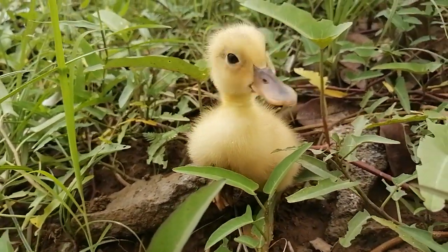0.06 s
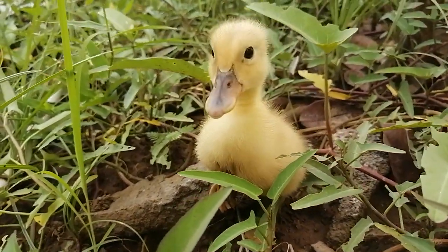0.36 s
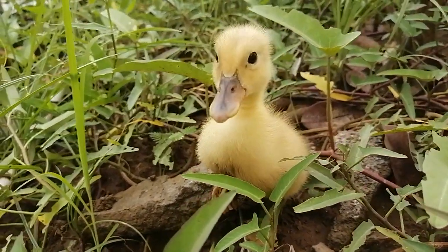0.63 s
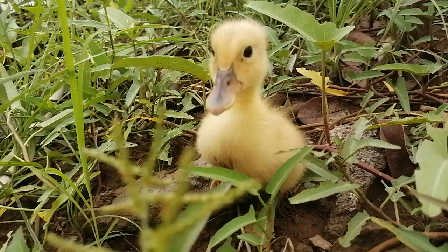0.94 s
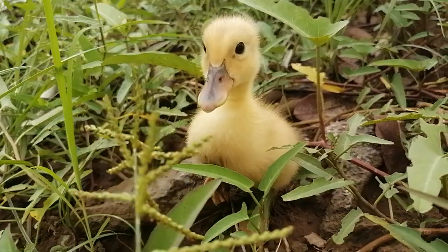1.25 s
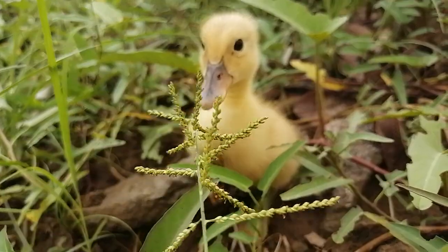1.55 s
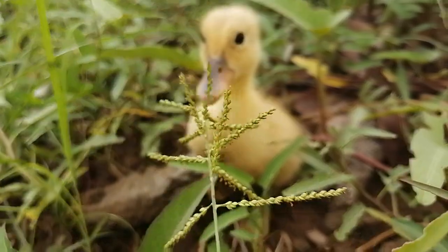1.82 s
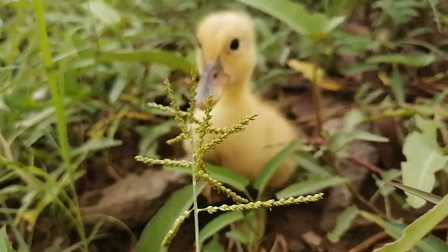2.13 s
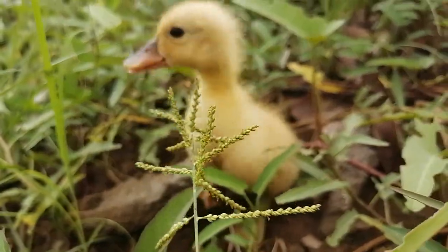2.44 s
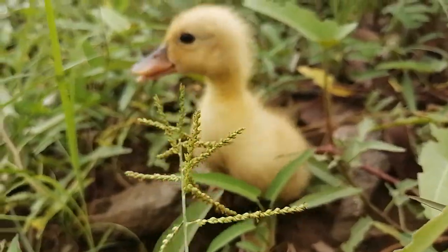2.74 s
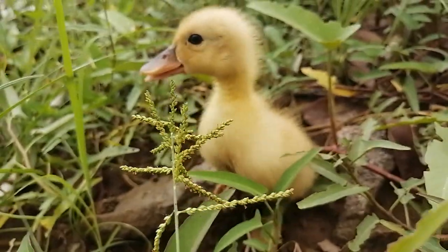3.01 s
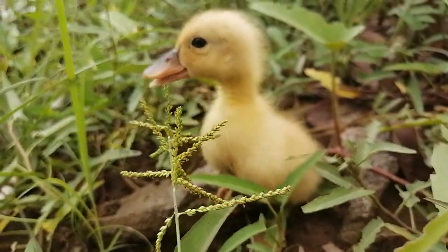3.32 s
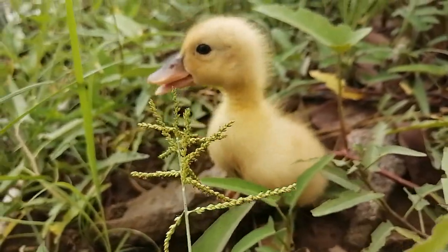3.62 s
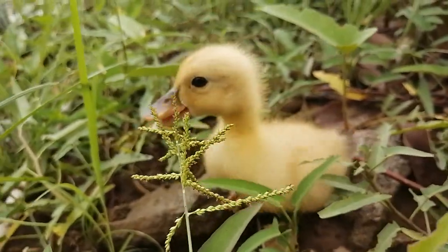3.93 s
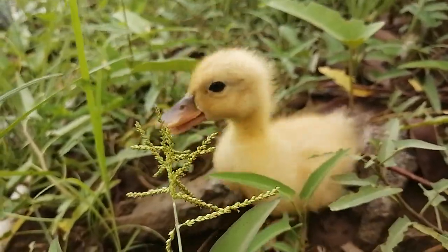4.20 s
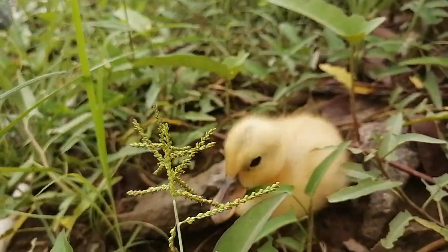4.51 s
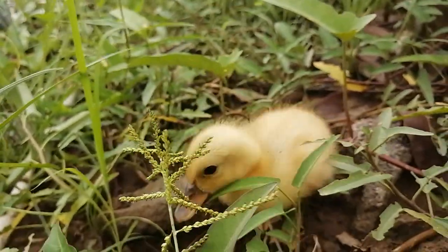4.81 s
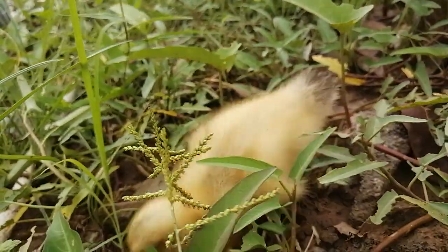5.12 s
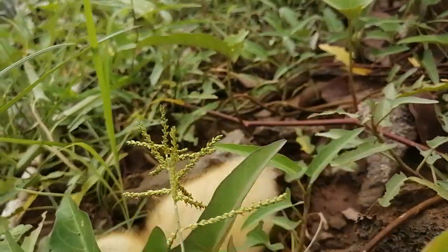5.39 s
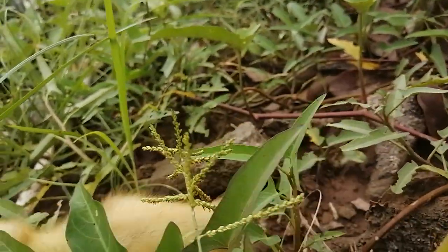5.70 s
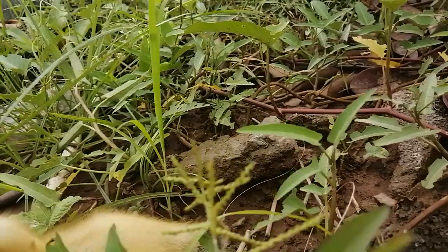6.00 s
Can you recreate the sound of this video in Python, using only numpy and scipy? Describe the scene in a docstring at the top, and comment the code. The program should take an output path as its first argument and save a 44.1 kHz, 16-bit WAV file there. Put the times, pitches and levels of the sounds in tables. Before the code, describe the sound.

High, slightly raspy duckling peeps repeat evenly and grow louder, followed by light ticks and rustling of plants outdoors.

```python
"""A low outdoor rumble comes first, with a far motor, a thin electronic whine and distant bird calls.
Then a duckling in the grass peeps fourteen times, five soft and nine loud, mostly on the left.
All but the first peep open with a rasp, the two sides of the syrinx beating, and slide into a
pure whistle. Stalks tick as the duckling moves, and the rustle grows as it pushes off at the end."""
import sys
import numpy as np
from scipy import signal
from scipy.io import wavfile
from scipy.ndimage import map_coordinates

SR = 44100
rng = np.random.default_rng(int(sys.argv[2]) if len(sys.argv) > 2 else 0)


def wrap_up_sound(samples):
    """Save the sound to the file named by the first command line argument, as 16-bit audio."""
    columns = np.atleast_2d(samples).T
    # keep every value between -1 and 1, then stretch to whole-number steps
    tamed = np.clip(columns, -1, 1)
    steps = np.round(tamed * 32767).astype(np.int16)
    wavfile.write(sys.argv[1], SR, steps)


N = 271215


def from_db(db):
    """Decibels to gain."""
    return 10 ** (np.asarray(db) / 20)


def unit_rms(x):
    """Scale to rms 1."""
    return x / np.sqrt(np.mean(x ** 2) + 1e-20)


def at_hz(curve, hz):
    """Read a curve on a log-frequency axis."""
    freqs, values = np.transpose(curve)
    return np.interp(np.log(hz), np.log(freqs), values)


def panned(db):
    """Stereo gains for a pan in dB, left over right."""
    return from_db(np.array([[db], [-db]]) / 2)


def band(x, low_hz, high_hz, order=2):
    """Band-pass."""
    sos = signal.butter(order, [low_hz, min(high_hz, SR / 2 - 500)], "band", fs=SR, output="sos")
    return signal.sosfilt(sos, x)


def drift(rate, n):
    """Smooth random modulation through rate points a second; spread near 1."""
    steps = np.arange(n) / SR * rate
    return map_coordinates(rng.standard_normal(int(steps[-1]) + 3), [steps], order=2, mode="nearest")


def phase_of(hz):
    """Running phase of a moving pitch."""
    return 2 * np.pi * np.cumsum(hz) / SR


def add(out, s, sound):
    """Mix a sound in from time s."""
    i = int(s * SR)
    out[:, i:i + sound.shape[-1]] += sound[..., :N - i]


def scatter(x, t60, low_hz, high_hz):
    """Outdoor reverb: countless small reflections from plants and ground, different on each side."""
    t = np.arange(int(t60 * SR)) / SR
    tail = band(rng.standard_normal((2, len(t))), low_hz, high_hz) * from_db(-60 * t / t60)
    return signal.fftconvolve(x[None], tail / np.sqrt(np.sum(tail ** 2) / 2), axes=1)[:, :N]


# tone of the air bed: f/Hz, relative density/dB
AIR_SPECTRUM = [(25, -10.5), (40, -6), (58, 3), (110, -1.5), (165, -7.5), (230, -12.5), (420, -21),
                (700, -27), (1700, -33), (4800, -37), (6700, -44.5), (9500, -51), (11800, -62.5),
                (14700, -55)]
# its width: f/Hz, left-right coherence (1 is mono)
AIR_COHERENCE = [(60, 0.99), (120, 0.9), (220, 0.8), (430, 0.31), (830, 0.088), (1600, 0), (6000, 0)]
# its balance: f/Hz, pan/dB
AIR_BALANCE = [(60, -4.5), (400, -5.5), (1300, -1.5), (3000, 5.5), (5000, -0.5), (8000, -3.5), (15000, -3)]
# swells in the rumble: t/s, rise/dB
RUMBLE_SWELLS = [(2.17, 3.5), (2.74, 5), (3.42, 2.5), (3.96, 5), (4.49, 4)]


def air(calm_db=-53, swell_half_width_s=.09, rustle_from_s=5.24, rustle_db_per_s=2.5):
    """Half-octave noise bands: a near-mono rumble, and a wide rustle rising as the duckling moves off."""
    t = np.arange(N) / SR
    swells_db = sum(rise * np.exp(-((t - s) / swell_half_width_s) ** 2) for s, rise in RUMBLE_SWELLS)
    rumble_db = swells_db + drift(6.4, N)
    rustle_db = rustle_db_per_s * np.maximum(t - rustle_from_s, 0)
    white = rng.standard_normal((2, 2, N))
    edges = 22 * 2 ** np.arange(0, 10, .5)
    out, calm = 0, 0
    for k, (low, high) in enumerate(zip(edges, edges[1:])):
        hz = np.sqrt(low * high)
        mid, side = band(white[k % 2], low, high)
        coherence = at_hz(AIR_COHERENCE, hz)
        gain = from_db(at_hz(AIR_SPECTRUM, hz) + drift(11, N)) * panned(at_hz(AIR_BALANCE, hz))
        noise = gain * (np.sqrt(1 + coherence) * mid + np.sqrt(1 - coherence) * side * [[1], [-1]])
        calm = calm + noise
        out = out + noise * from_db(rumble_db * (hz < 130) + rustle_db * (350 < hz < 7000))
    return from_db(calm_db) * out / np.std(calm)


# tones of the electronics: f/Hz, left rms/dB, right rms/dB
WHINE_TONES = [(2046, -85, -93), (2767, -76, -88), (3430, -78.5, -94), (3490, -81, -94), (4150, -86.5, -90),
               (4812, -91, -92), (5534, -100, -88), (6225, -105, -93), (7590, -103, -95), (9685, -96, -115),
               (14492, -114, -94.5)]
# narrow bands of hiss: f/Hz, width/Hz, left rms/dB, right rms/dB
HISS_BANDS = [(4670, 270, -81, -85), (9580, 260, -89, -112), (14650, 950, -112, -89)]


def whine(wobble_hz=3):
    """The electronics whine in thin, nearly steady tones over narrow bands of hiss."""
    out = np.zeros((2, N))
    for hz, left, right in WHINE_TONES:
        tone = np.sqrt(2) * np.sin(phase_of(hz + wobble_hz * drift(60, N)))
        out += from_db([[left], [right]]) * tone
    for hz, width, left, right in HISS_BANDS:
        hiss = band(rng.standard_normal((2, N)), hz - width / 2, hz + width / 2)
        out += from_db([[left], [right]]) * unit_rms(hiss)
    return out


# partials of the motor's drone: f/Hz, base level/dB
MOTOR_ORDERS = [(143, -66), (248, -68.5), (296, -72), (354, -79.5), (395, -77.5)]
# how well the drone carries: t/s, gain/dB
MOTOR_RIDE = [(0, -1), (1.899, -5), (2.798, 2.5), (3.601, 0.5), (4.601, 1), (6.15, 1.5)]


def motor(wander=.009, sway_db=3):
    """Low orders of a far motor, swaying as the air carries them."""
    carry_db = np.interp(np.arange(N) / SR, *np.transpose(MOTOR_RIDE))
    drone = np.zeros(N)
    for hz, db in MOTOR_ORDERS:
        gain = np.sqrt(2) * from_db(db + carry_db + sway_db * (drift(3.7, N) - .5))
        drone += gain * np.sin(phase_of(hz * (1 + wander * drift(12, N))))
    return drone * panned(-0.5)


def far_tones(notes, fall_octaves_per_s, waver, direct_db, wet_db, t60, wet_band_hz):
    """Tones that slide down at a steady rate, smeared by the distance."""
    out = np.zeros((2, N))
    for s, length, start_hz, db, pan_db in notes:
        t = np.arange(int(length * SR)) / SR
        hz = start_hz * 2 ** (-fall_octaves_per_s * t) * (1 + waver * drift(400, len(t)))
        note = from_db(db) * np.sqrt(np.sin(np.pi * t / length)) * np.sin(phase_of(hz))
        add(out, s, panned(pan_db) * from_db(direct_db) * note)
        add(out, s, panned(pan_db) * from_db(wet_db) * scatter(note, t60, *wet_band_hz))
    return out


# one motor swell, then five hoots:
# t/s, length/s, starting f/Hz, level before the direct and wet gains/dB
LOW_TONE_CUES = [(.08, .21, 352.6, -62), (.1, 0.27, 644, -72), (2.70, 0.16, 444, -62),
                 (3.05, .27, 440, -59), (3.42, 0.11, 459.5, -67), (3.862, .3, 439, -57.5)]


def low_tones(pan_db=-8.5):
    """Far off on the right: a brief swell of the motor's 353 Hz drone, then soft, almost level hoots."""
    return far_tones([(*cue, pan_db) for cue in LOW_TONE_CUES], fall_octaves_per_s=.15, waver=0.0039,
                     direct_db=0.5, wet_db=-20, t60=.5, wet_band_hz=(253, 895))


# chirp cues: t/s, length/s, starting f/Hz, level before the direct and wet gains/dB, pan/dB
CHIRP_CUES = [(.06, .12, 4650, -71.5, 5), (.285, 0.021, 1725, -63.5, 9), (4.116, 0.02, 1397, -55, -14.5),
              (4.284, 0.018, 1043, -55.5, -8), (5.39, 0.15, 4710, -72, 6), (5.615, .056, 3040, -59.5, -2),
              (5.715, 0.042, 2805, -59, -6.5), (5.995, .045, 2973, -60.5, -6),
              (6.105, .043, 2656, -57.5, -7)]


def birds():
    """Far birds chirp in short, rough, quickly falling notes."""
    return far_tones(CHIRP_CUES, fall_octaves_per_s=6.4, waver=0.05,
                     direct_db=-4.5, wet_db=-8, t60=.25, wet_band_hz=(905, 5000))


# ticks of stalks and dry leaves: t/s, level before panning/dB, centre f/Hz, t60/s
STALK_TICKS = [(2.925, -56.5, 5180, .01), (4.225, -60, 6500, .008), (4.409, -59.5, 5000, 0.094),
               (5.05, -64, 2500, 0.0123), (5.302, -62.5, 2500, .04), (5.346, -54.5, 1220, .09),
               (5.352, -57, 3100, 0.019), (5.379, -59, 3460, 0.024), (5.894, -71, 3150, .03),
               (5.921, -65, 1400, .04)]


def stalks(band_ratio=1.16, pan_db=6.5):
    """Each tick is a quickly damped noise burst around the stalk's pitch."""
    out = np.zeros((2, N))
    for s, db, hz, t60 in STALK_TICKS:
        t = np.arange(int(t60 * SR)) / SR
        burst = unit_rms(band(rng.standard_normal((2, len(t))), hz / band_ratio, hz * band_ratio))
        add(out, s, panned(pan_db) * from_db(db - 60 * t / t60) * burst)
    return out


def tone_on_left(hz, pan_curve, left_lag_s=0.000322):
    """A sine that is quieter on the right and arrives a fraction of a millisecond later on the left."""
    phase = phase_of(hz)
    right = from_db(-at_hz(pan_curve, hz)) * np.sin(phase + 2 * np.pi * hz * left_lag_s)
    return np.array([np.sin(phase), right])


def peep_pitch(t, length, turns_s, turns_hz, drop=0.23, drop_s=0.01, jitter=0.0023, waver=.005):
    """The muscles ease from one pitch to the next; the pitch collapses as the air stops."""
    turns = np.arange(len(turns_s))
    stage = np.interp(t, turns_s, turns)
    eased = np.floor(stage) + (1 - np.cos(np.pi * (stage % 1))) / 2
    collapse = 1 - drop * np.clip((t - length) / drop_s + 1, 0, 1) ** 2
    wobble = 1 + jitter * drift(600, len(t)) + waver * drift(82.8, len(t))
    return np.interp(eased, turns, turns_hz) * collapse * wobble


# a peep's tail after its pitch dip: dip f/Hz, end pitch over dip pitch, sag below the swell/dB
PEEP_TAILS = [(2185, 0.86, 10.5), (2323, 0.997, 4), (2428, 1.056, 1.5), (2550, 1.027, 7), (2805, 1.068, 3)]


def peep(length, crest_hz, dip_hz, swell_db, pan_curve, attack_s=0.00092, release_s=0.013,
         recover_s=0.036, shimmer_db=1.14, beat_waver=.14, upper_ratio=1.363, hiss_db=-41):
    """The syrinx whistles up to a crest, down to a dip and into a tail; effort shapes the rasp."""
    t = np.arange(int(length * SR)) / SR
    effort = np.interp(swell_db, [-44, -18.5], [0, 1])

    def by_effort(soft, loud):
        return soft + (loud - soft) * effort

    dip_s = 0.066 * (length / 0.11) ** 0.39   # a shorter peep dips sooner
    crest_s = .373 * dip_s
    dips, end_ratios, sags = np.transpose(PEEP_TAILS)
    start_hz = crest_hz * by_effort(.98, .94)
    end_hz = dip_hz * np.interp(dip_hz, dips, end_ratios)
    hz = peep_pitch(t, length, [0, crest_s, dip_s, dip_s + recover_s],
                    [start_hz, crest_hz, dip_hz, end_hz])

    # the level swells to its peak between the pitch crest and the dip
    swell_s = crest_s + (dip_s - crest_s) * by_effort(0.67, 0.45)
    crest_db = swell_db + by_effort(-6.5, -8.5)
    onset_db = crest_db + by_effort(-8.05, -23.69)
    held_db = swell_db - np.interp(dip_hz, dips, sags)
    level_db = np.interp(t, [0, crest_s, swell_s, dip_s], [onset_db, crest_db, swell_db, held_db])
    # a soft peep nearly breaks just after its crest
    break_db = by_effort(-7, 0) * np.exp(-((t - crest_s - .007) / 0.0035) ** 2)
    gate = np.minimum(t / attack_s, 1) * np.clip((length - t) / release_s, 0, 1)
    envelope = gate * from_db(level_db + break_db + shimmer_db * drift(150, len(t)))

    # the other side of the syrinx runs sharp and beats against the first until they lock at the crest
    unlocked = np.interp(t, [.004, .009, crest_s - .001, crest_s + .0035], [.1, 1, 0.6, 0.014])
    rasp = from_db(by_effort(5.5, 2)) * unlocked * (crest_hz > 3000)
    beat_hz = by_effort(240, 385) * np.interp(t, [0, .013], [.5, 1])
    beat_hz *= 1 + beat_waver * drift(500, len(t))
    # a hard push adds a higher arch over the crest
    arch = np.sin(np.pi * np.clip((t - .005) / 0.041, 0, 1)) * (dip_hz > 2290)
    upper = arch * from_db(by_effort(-17.55, -11.85) + np.minimum(0, crest_db - level_db))
    upper_hz = hz * upper_ratio * np.interp(t, [0, crest_s], [.95, 1])
    # the throat passes the octave best just under 6 kHz
    throat_db = at_hz([(4800, -21), (5500, 5), (6000, 0.5), (6800, -21.5)], 2 * hz)
    octave = from_db(by_effort(-40, -29) + throat_db)

    partials = [(hz, 1), (hz + beat_hz, rasp), (hz + 2 * beat_hz, from_db(-8.5) * rasp * effort),
                (upper_hz, upper), (2 * hz, octave)]
    voice = sum(gain * tone_on_left(partial_hz, pan_curve) for partial_hz, gain in partials)
    # air hisses through the open bill
    hiss = unit_rms(band(rng.standard_normal(len(t)), 3300, 4600, order=4))
    return envelope * (voice + hiss * from_db([[hiss_db], [hiss_db - 12]]))


# peep cues: t/s, length/s, crest f/Hz, dip f/Hz, swell level/dB
PEEP_CUES = [(0.715, 0.055, 2835, 2190, -36.5), (0.953, 0.065, 3090, 2217, -35.5),
             (1.238, 0.098, 3310, 2256, -35.5), (1.516, 0.102, 3360, 2314, -34.5),
             (1.797, 0.12, 3410, 2430, -35), (2.076, 0.11, 3380, 2624, -20),
             (2.346, 0.12, 3477, 2726, -19.5), (2.618, 0.12, 3452, 2770, -20),
             (2.895, 0.12, 3384, 2784, -20.2), (3.172, 0.120, 3380, 2838, -20),
             (3.447, 0.12, 3450, 2823, -19.5), (3.726, 0.12, 3465, 2852, -19),
             (3.994, 0.12, 3460, 2827, -18.5), (4.269, 0.120, 3313, 2748, -19)]
# stereo image with the bill to the front, then aside: f/Hz, left over right/dB
BILL_FRONT = [(2200, 4), (2500, 9), (2680, 4.5), (2860, 22.5), (3020, 11), (3200, 24), (3420, 13),
              (4500, 16), (5500, 9.5), (6100, 1)]
BILL_ASIDE = [(2700, 6.4), (2860, 17), (3030, 15), (3200, 10), (3400, 14), (4500, 18), (5500, 12),
              (6100, 1.2)]


def duckling(head_turn_s=2.5, grass_db=-36, bushes_db=-51):
    """The peeps, with a quick return from the grass and a fainter, longer one from the plants beyond."""
    direct = np.zeros((2, N))
    for s, *shape in PEEP_CUES:
        add(direct, s, peep(*shape, BILL_FRONT if s < head_turn_s else BILL_ASIDE))
    grass = from_db(grass_db) * scatter(direct[0], t60=0.14, low_hz=1800, high_hz=4500)
    bushes = from_db(bushes_db) * scatter(direct[0], t60=1.0, low_hz=1900, high_hz=5400)
    return direct + grass + bushes


def scene():
    """The mix: duckling and stalks up close, everything else far behind."""
    return birds() + low_tones() + duckling() + stalks() + air() + motor() + whine()


def record(dry, cutoff_hz=15200):
    """A steep low-pass takes the top off the mix."""
    return signal.sosfilt(signal.ellip(10, .1, 70, cutoff_hz, fs=SR, output="sos"), dry)


dry = scene()
out = record(dry)
wrap_up_sound(out)
```